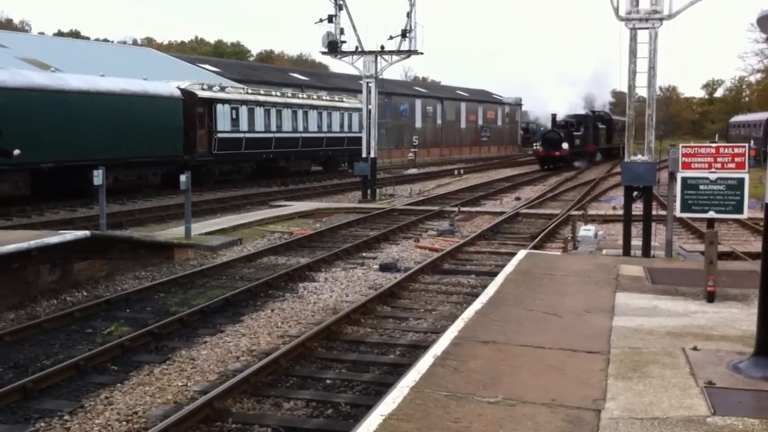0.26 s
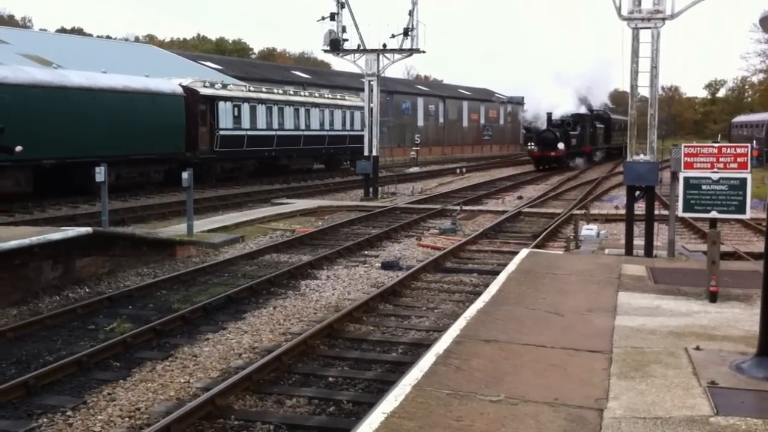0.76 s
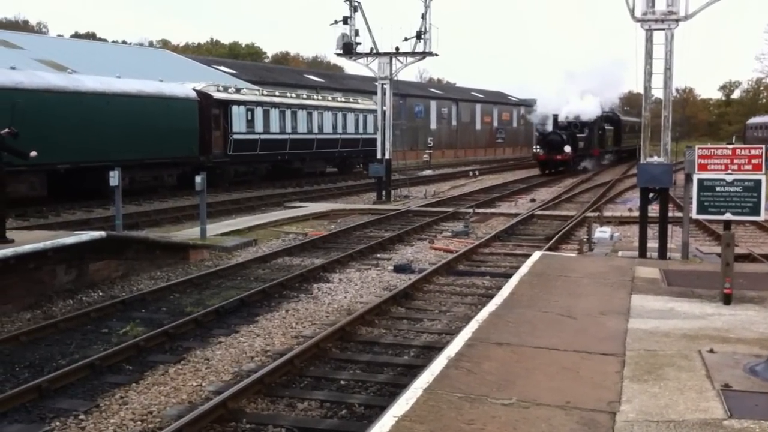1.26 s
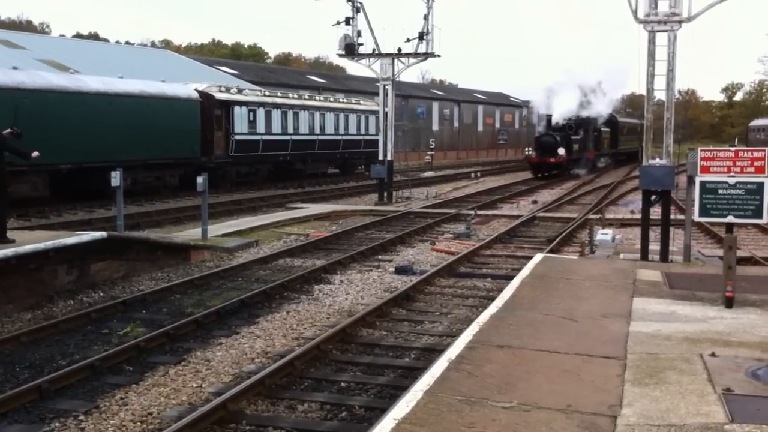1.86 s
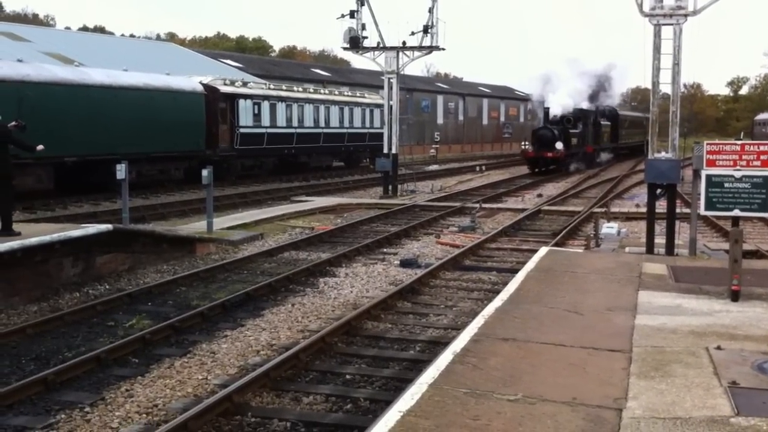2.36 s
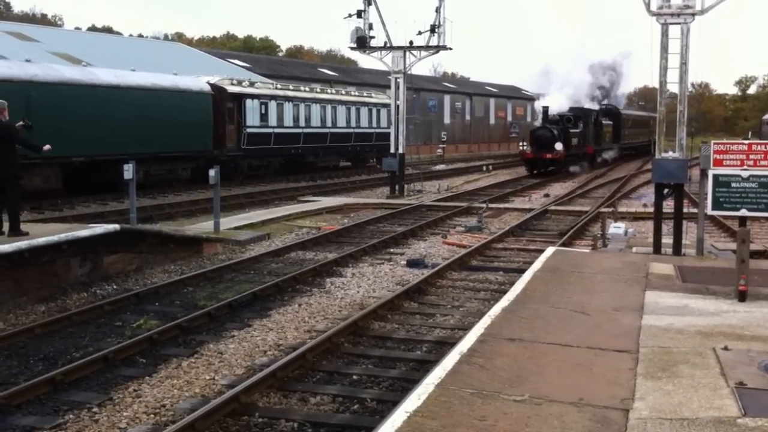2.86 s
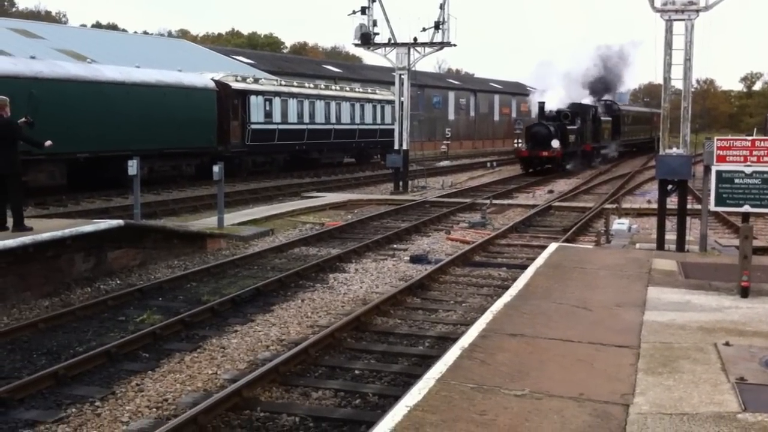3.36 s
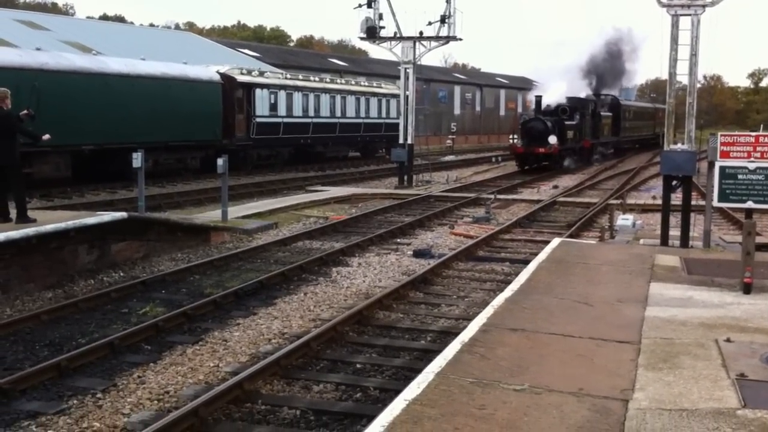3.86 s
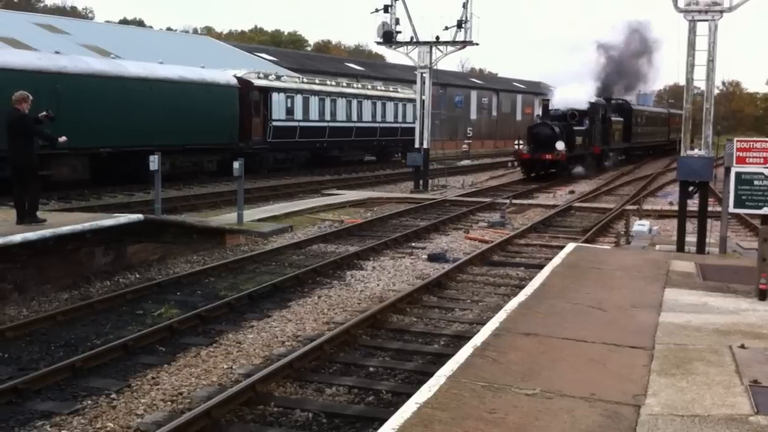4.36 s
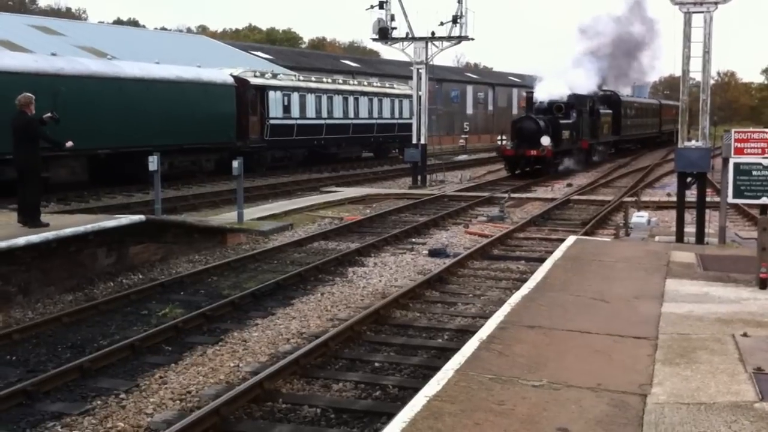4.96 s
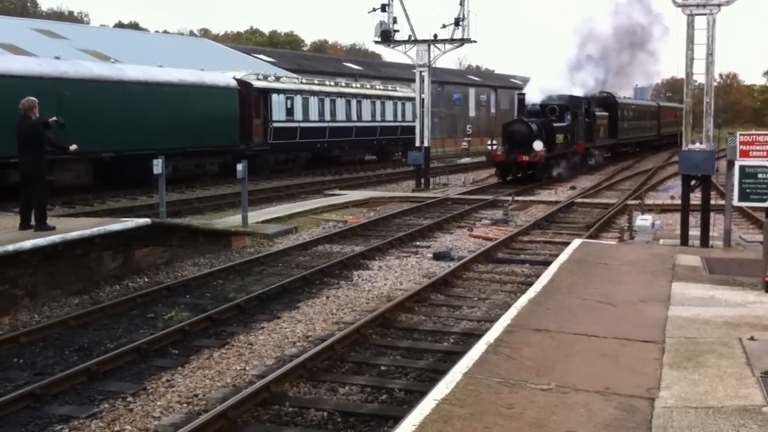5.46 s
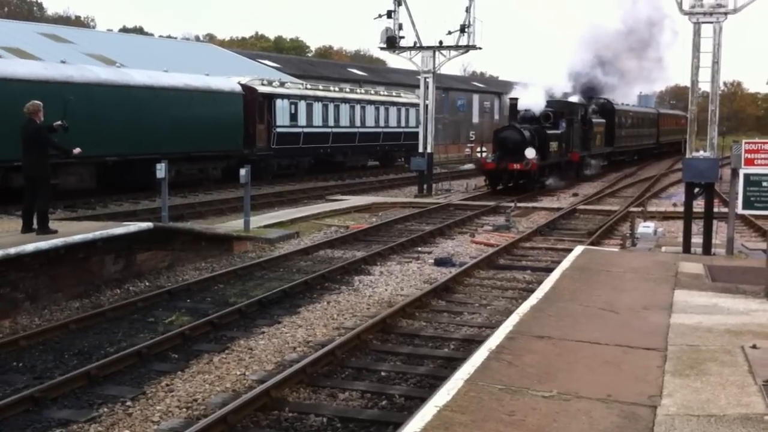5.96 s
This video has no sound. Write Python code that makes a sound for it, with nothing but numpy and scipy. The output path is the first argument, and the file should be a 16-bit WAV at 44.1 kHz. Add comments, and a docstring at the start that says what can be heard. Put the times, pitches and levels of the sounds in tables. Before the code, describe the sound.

Blustery outdoor wind noise, irregular low buffets and sharp raspy microphone knocks, over a soft continuous hiss of steam from two small locomotives.

```python
"""Gusty wind buffets the one microphone of a hand-held camera; behind it hisses steam from two small engines.
Wind: eddies swept past the port rumble from the start; thumps are pressure kicks with a rasp, hard at 1.3 s,
crowded at 2.4-2.9 s, sparser after 3 s, hardest at 5.0 and 5.2 s, where a limiter ducks the level.
Steam: coloured noise throughout, strongest in hiss near 1.6 s, weakest near 3 s, strong again near 6.1 s."""
import sys
import numpy as np
from scipy import signal
from scipy.fft import rfft, irfft
from scipy.io import wavfile
from scipy.ndimage import uniform_filter1d, minimum_filter1d, map_coordinates

SR = 44100
rng = np.random.default_rng(int(sys.argv[2]) if len(sys.argv) > 2 else 0)


def file_out(sig):
    """Save sig as 16-bit WAV at sys.argv[1]."""
    # one column per channel
    cols = np.atleast_2d(sig).T
    # limit, then scale
    lim = np.clip(cols, -1, 1)
    pcm = np.round(lim * 32767).astype(np.int16)
    wavfile.write(sys.argv[1], SR, pcm)


N = 273420
T = np.arange(N) / SR


def undb(db):
    """Decibels to amplitude gain."""
    return 10 ** (np.asarray(db) / 20)


def curve(table):
    """Second column of a (time [s], value) table, interpolated to every sample."""
    time_s, value = np.transpose(table)
    return np.interp(T, time_s, value)


def noise(spectrum, size=N):
    """Gaussian noise of rms 1, coloured by (frequency [Hz], density [dB]) points, silent outside them."""
    hz, db = np.transpose(spectrum)
    bin_hz = np.maximum(np.arange(size // 2 + 1) * SR / size, 1)
    colour_db = np.interp(np.log(bin_hz), np.log(hz), db, left=-200, right=-200)
    x = irfft(rfft(rng.standard_normal(size)) * undb(colour_db), size)
    return x / x.std()


def walk(rate_hz):
    """Smooth random signal of standard deviation 1, low-passed around rate_hz."""
    bin_hz = np.arange(N // 2 + 1) * SR / N
    x = irfft(rfft(rng.standard_normal(N)) * np.exp(-(bin_hz / rate_hz) ** 2), N)
    return x / x.std()


def swell(time_s, length_s):
    """Bell of power around time_s; length_s is its full width at 1/e."""
    return np.exp(-np.minimum((2 * (T - time_s) / length_s) ** 2, 20))


def port(pressure, low_cut_hz=156, leak_db=-26, ring_hz=168, ring_q=1.9, ring_db=-8):
    """Microphone's steep bass cut, ringing a little at its edge; a gentler cut leaks some deep rumble."""
    steep_cut = signal.butter(4, low_cut_hz, "high", fs=SR, output="sos")
    gentle_cut = signal.butter(1, low_cut_hz, "high", fs=SR, output="sos")
    steep = signal.sosfilt(steep_cut, pressure)
    gentle = signal.sosfilt(gentle_cut, pressure)
    ring = signal.lfilter(*signal.iirpeak(ring_hz, ring_q, fs=SR), steep)
    return steep + undb(ring_db) * ring + undb(leak_db) * gentle


# turbulence pressure at unit speed: (frequency [Hz], density [dB])
EDDY_SPECTRUM = [(20, 12.5), (170, -1), (300, -5), (500, -10), (750, -19.5), (1100, -28.5), (2500, -45)]
# short buffets: (time [s], length [s], level before trim [dB], relative eddy speed)
BUFFETS = [(0.039, 0.052, -21, 1.17), (0.322, 0.019, -22, 0.63), (0.408, 0.074, -21.5, 0.89),
           (0.538, 0.054, -20.5, 0.66), (0.682, 0.041, -19.5, .95), (0.763, 0.047, -24, 1.085),
           (0.834, 0.039, -21, 1.25), (1.053, 0.049, -20, 0.62), (1.121, .02, -21, 0.59),
           (1.164, 0.022, -21, 0.98), (1.276, .02, -20, 1.27), (1.359, 0.036, -18, 0.74),
           (2.257, .038, -22, 0.82), (2.377, .047, -19, 1.024), (2.461, 0.042, -13.5, 1.44),
           (2.526, 0.02, -18, 1.104), (2.58, 0.028, -20, 1.05), (2.64, 0.051, -15, 1.43),
           (2.741, 0.039, -20, 0.79), (2.846, 0.048, -20, 1.05), (3.008, .03, -21, .9),
           (3.324, 0.026, -18.5, 0.58), (3.457, .035, -21.5, 0.75), (3.883, 0.03445, -22.5, .7),
           (4.017, 0.042, -22.5, 0.78), (4.14, 0.062, -24.5, 1.03), (4.369, 0.042, -18, .85),
           (4.474, 0.03, -20.5, 1.53), (4.913, 0.022, -20.5, 0.62), (5.007, 0.042, -15, 1.22),
           (5.226, 0.036, -19, 1.42), (5.431, 0.048, -27.5, .65), (5.544, .045, -17.5, 1.4),
           (5.643, .016, -16, 1.5), (5.84, 0.039, -20.5, 0.93), (6.169, 0.034, -19, 1.3)]


def wind(breeze_speed=0.66, breeze_trim_db=-0.28, flutter_db=3.5, flutter_hz=30, buffet_trim_db=-0.05,
         swirl=0.26, swirl_hz=110, swirl_push=0.86):
    """An eddy pattern swept past the port: faster is brighter; wind power sets the loudness."""
    power = gusts() * undb(breeze_trim_db + flutter_db * walk(flutter_hz)) ** 2
    speed_power = power * breeze_speed
    for time_s, length_s, level_db, speed in BUFFETS:
        bump = undb(level_db + buffet_trim_db) ** 2 * swell(time_s, length_s)
        power = power + bump
        speed_power = speed_power + bump * speed
    # unsteady flow: fine eddies arrive in short spurts
    spurt = np.exp(swirl * walk(swirl_hz))
    travelled_samples = np.cumsum(spurt * speed_power / power)
    pattern = noise(EDDY_SPECTRUM, size=2 * N)
    swept = map_coordinates(pattern, [travelled_samples], order=1, mode="wrap")
    rumble = port(swept * spurt ** swirl_push)
    # level to running rms 1, then apply the wind's own strength
    rumble /= np.sqrt(uniform_filter1d(rumble ** 2, size=900))
    return rumble * np.sqrt(power)


# steady gusts: (full from [s], full until [s], level before breeze trim and flutter [dB])
GUSTS = [(0, 0.458, -30.5), (0.535, 0.894, -28), (1.041, 1.56, -28.5), (1.7, 2.419, -26.5),
         (2.523, 2.763, -30), (3.281, 3.6, -32.5), (3.8, 4.399, -27), (4.5, 5.22, -30),
         (5.539, 5.86, -26.5), (5.98, 6.197, -31)]


def gusts(rise_s=0.0501, fall_s=0.0494, lull_db=-38):
    """Wind power: each gust rises, holds and falls back to a light air."""
    power = undb(lull_db) ** 2
    for start_s, end_s, level_db in GUSTS:
        rise = np.clip((T - start_s) / rise_s + 1, 0, 1)
        fall = np.clip((end_s - T) / fall_s + 1, 0, 1)
        power = power + (undb(level_db) * rise * fall) ** 2
    return power


# hard eddies striking the port: (time [s], peak before trim [dB], rasp before trim [dB])
THUMPS = [(0.0183, -5.5, -32), (.0567, -10.5, -24), (0.0709, -11, -47), (.394, -6.5, -39),
          (0.5457, -7.5, -46), (0.5552, -12.5, -46), (0.604, -9, -31), (0.6247, -8, -36),
          (0.6688, -6.5, -34), (.7348, -10, -24), (0.8165, -9, -26), (.8333, -12.5, -21),
          (0.8971, -9.5, -50), (1.1087, -6, -40), (1.2006, -10, -40), (1.2414, -10, -43),
          (1.2818, -5.5, -24), (1.329, 0.5, -36), (1.3402, -3, -25), (1.3529, -7, -28),
          (1.8608, -11.5, -36), (2.08, -10, -38), (2.1237, -11, -41), (2.2422, -8.5, -32),
          (2.3163, -6, -46), (2.4319, 1.5, -22.5), (2.4427, -6.5, -13), (2.4557, 0.5, -15),
          (2.5493, -4, -18), (2.5724, -7, -30), (2.6134, -7, -31), (2.6255, -1.5, -16.5),
          (2.6654, -1.5, -27), (2.7113, -6.5, -33), (2.7283, -9, -40), (2.7456, -8.5, -36),
          (2.8579, -2, -24.5), (2.8724, -6, -27), (2.999, -10, -32), (3.446, -10.5, -47),
          (3.597, -27.5, -31), (3.8642, -7.5, -41), (3.9337, -7.5, -40), (3.9742, -7, -32),
          (4.206, -8.5, -28), (4.3534, -7, -23), (4.372, -9, -32), (4.3941, -4, -37), (4.4681, -8, -27),
          (4.8657, -7.5, -19.5), (4.9782, -8, -31), (4.9969, 4.5, -11.5), (5.0181, -4, -25),
          (5.0493, -7.5, -34), (5.231, 5.5, -14.5), (5.4971, -24.5, -22), (5.5425, -5, -29.5),
          (5.557, -6.5, -34), (5.6269, -5, -32), (5.6398, -4, -24), (5.6965, -3.5, -16.5), (5.717, -6, -27),
          (5.831, -8.5, -46), (6.0067, -8.5, -25), (6.04, -12.5, -34), (6.1513, -9, -25), (6.1602, -6, -27),
          (6.1778, -3, -16)]
# fine turbulence torn off by a hard eddy: (frequency [Hz], density [dB])
RASP_SPECTRUM = [(300, -18), (700, 1), (1300, -7), (2000, -14), (2900, -44)]
# finest turbulence, growing as the square of the rasp: (frequency [Hz], density [dB])
CRACKLE_SPECTRUM = [(1300, -1), (2300, -3), (4000, -18)]


def thumps(kick_s=0.000458, kick_trim_db=-1, suction=0.56, tail=2.44, dull_db=23, doubling_db=16,
           soft_hz=2600, rasp_s=0.003, rasp_trim_db=-1, crackle_db=-1):
    """Brief suction, then a pressure jump that the bass cut swings back, in a spurt of fine turbulence."""
    pressure, spurts = np.zeros(N), np.zeros(N)
    rounding = signal.butter(4, soft_hz, fs=SR, output="sos")
    around_s = np.arange(-SR // 100, SR // 25) / SR
    for time_s, peak_db, rasp_db in THUMPS:
        # strong eddies with little rasp push for longer
        stretch = 2 ** ((peak_db - rasp_db - dull_db) / doubling_db)
        age = around_s / (kick_s * stretch)
        push = np.tanh(age) * np.where(age < 0, suction, 1) * np.exp(-np.abs(age) / tail)
        kick = port(signal.sosfilt(rounding, push))
        # the positive peak lands on time_s
        start = int(time_s * SR) - kick.argmax()
        kick = undb(peak_db + kick_trim_db) * kick / np.abs(kick).max()
        pressure[start:start + len(kick)] += kick[:N - start]
        spurts += undb(rasp_db + rasp_trim_db) / (1 + ((T - time_s) / rasp_s) ** 4)
    rasp = spurts * noise(RASP_SPECTRUM)
    crackle = undb(crackle_db) * spurts ** 2 * noise(CRACKLE_SPECTRUM)
    return pressure + rasp + crackle


# steam colours, low to high: (frequency [Hz], density [dB])
RUSH_SPECTRUM = [(200, -12), (1000, -8.5), (1250, 1), (1700, -2.5), (2050, 2), (2500, -4), (2900, -5.5),
                 (3600, -14.5)]
HISS_SPECTRUM = [(3600, -14), (4000, -9), (4700, -5.5), (5600, -3), (6500, 1), (7800, -2), (8800, -8.5),
                 (9500, -22)]
EDGE_SPECTRUM = [(8900, -8), (9600, -0.5), (10400, 2), (11500, -12)]
SIZZLE_SPECTRUM = [(10600, -2.5), (11600, -2), (12600, -1.5), (13800, -5), (14800, -6.5), (15800, -28)]
# low rush: (time [s], level [dB])
RUSH_LEVEL = [(0, -39.5), (.45, -41), (.95, -36.5), (1.6, -38.5), (2.2, -40), (3.1, -41), (3.8, -38),
              (4.3, -40), (5.1, -40), (6.2, -39.5)]
# hiss as the wind carries it over: (time [s], level before trim and waver [dB])
HISS_LEVEL = [(0, -38), (.15, -40), (.78, -40.5), (.86, -37), (1.58, -34.5), (1.82, -41), (1.96, -38),
              (2.12, -40), (2.98, -43.5), (3.35, -36.5), (3.6, -38), (3.75, -38.5), (4.5, -37), (4.95, -40),
              (5.4, -42), (5.9, -40.5), (6.13, -35), (6.2, -35.5)]


def steam(hiss_trim_db=0.07, usual_hiss_db=-39, edge_db=-43.5, edge_db_per_db=0.49,
          sizzle_db=-42, sizzle_db_per_db=0.68, waver_db=0.88, waver_hz=7):
    """Turbulent jets as noise: low rush, hiss, thin edge near 10 kHz and sizzle above it."""
    hiss_level_db = curve(HISS_LEVEL)
    surge_db = hiss_level_db - usual_hiss_db
    rush = noise(RUSH_SPECTRUM) * undb(curve(RUSH_LEVEL))
    hiss = noise(HISS_SPECTRUM) * undb(hiss_level_db + hiss_trim_db)
    edge = noise(EDGE_SPECTRUM) * undb(edge_db + edge_db_per_db * surge_db)
    sizzle = noise(SIZZLE_SPECTRUM) * undb(sizzle_db + sizzle_db_per_db * surge_db)
    # wind bends short waves most: only the treble wavers
    treble = (hiss + edge + sizzle + flares()) * undb(waver_db * walk(waver_hz))
    return patchy(rush + treble)


# swells in the treble of the steam: (time [s], length [s], centre [Hz], level before waver [dB])
FLARES = [(.35, .17, 12300, -37.5), (0.597, 0.13, 12310, -39), (.9, 0.089, 12500, -39),
          (1.15, 0.75, 4900, -45.5), (1.558, 0.075, 12480, -38), (2.155, 0.27, 10250, -41.5),
          (3.421, .28, 12400, -40), (4.496, 0.066, 6754, -39.5), (4.701, 0.096, 7425, -38),
          (4.8, 0.42, 12300, -42), (4.899, 0.84, 9030, -44.5), (6.061, 0.12, 12340, -40)]
# flare colour: (multiple of centre frequency, density [dB])
FLARE_SPECTRUM = [(.8, -26), (.93, -3.5), (1, -4), (1.07, -0.5), (1.2, -19)]


def flares():
    """Bands of noise centred between about 5 and 12 kHz, each swelling and fading over 0.07 to 0.84 s."""
    total = np.zeros(N)
    for time_s, length_s, centre_hz, level_db in FLARES:
        spectrum = [(centre_hz * multiple, db) for multiple, db in FLARE_SPECTRUM]
        total += noise(spectrum) * undb(level_db) * np.sqrt(swell(time_s, length_s))
    return total


def patchy(x, patch_db=1.62, patch_hz=300, patch_s=0.1):
    """Moving air lets narrow ranges of a distant sound swell and fade on their own."""
    hz, time_s, cells = signal.stft(x, SR, nperseg=512)
    across = np.exp(-((hz[:, None] - hz) / patch_hz) ** 2)
    along = np.exp(-((time_s[:, None] - time_s) / patch_s) ** 2)
    field = across @ rng.standard_normal(cells.shape) @ along
    gain = undb(patch_db * field / field.std())
    return signal.istft(cells * gain, SR)[1][:N]


def scene():
    """One microphone feeds both channels."""
    mono = wind() + thumps() + steam()
    return np.array([mono, mono])


def limiter(x, recover_db_per_s=6, smooth_samples=64):
    """Gain drops quickly around peaks over full scale, then creeps back; what still sticks out is clipped."""
    over_db = 20 * np.log10(np.maximum(np.abs(x).max(axis=0), 1))
    recovery_db = recover_db_per_s * T
    duck_db = np.maximum.accumulate(over_db + recovery_db) - recovery_db
    widened_db = minimum_filter1d(-duck_db, size=smooth_samples)
    gain_db = uniform_filter1d(widened_db, size=smooth_samples)
    return np.clip(x * undb(gain_db), -1, 1)


def record(dry, top_hz=15700):
    """The camera limits the peaks, then cuts the top steeply."""
    top_cut = signal.ellip(10, 0.2, 80, top_hz, fs=SR, output="sos")
    return signal.sosfilt(top_cut, limiter(dry))


dry = scene()
out = record(dry)
file_out(out)
```